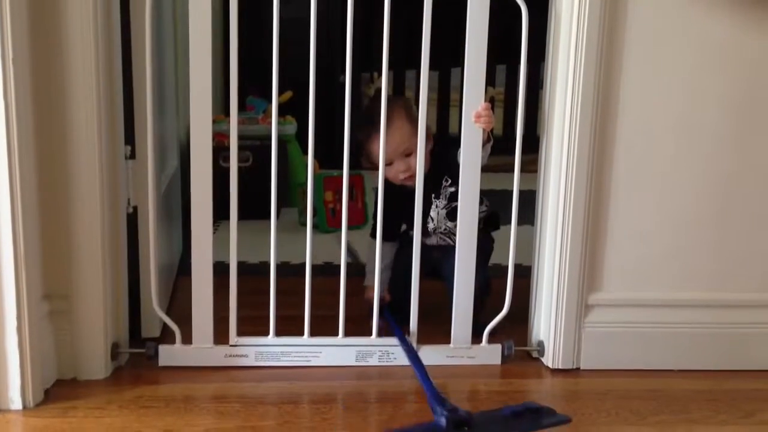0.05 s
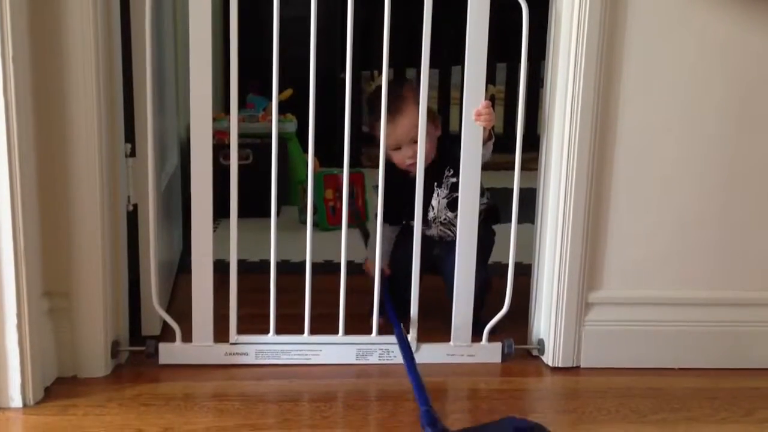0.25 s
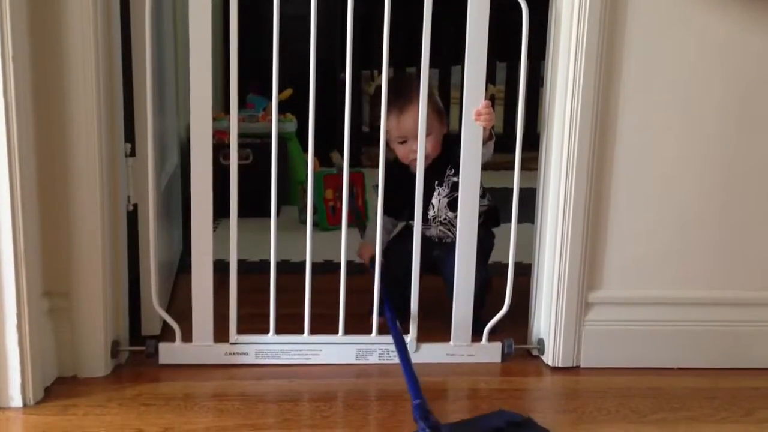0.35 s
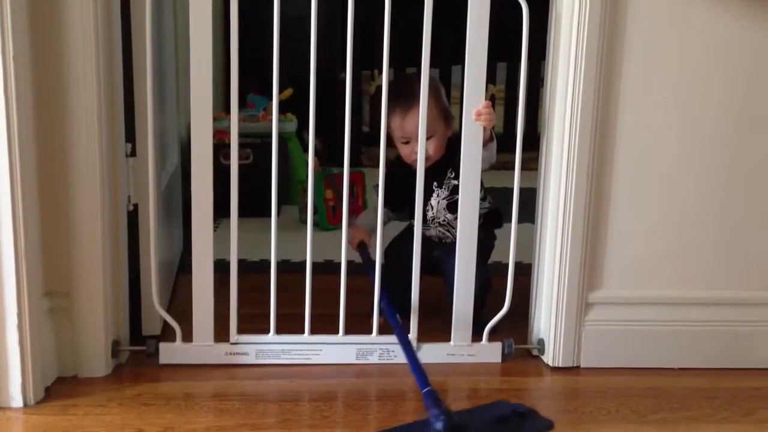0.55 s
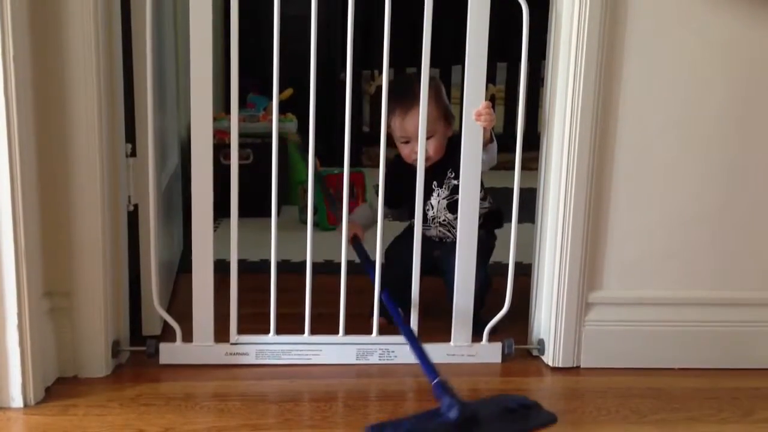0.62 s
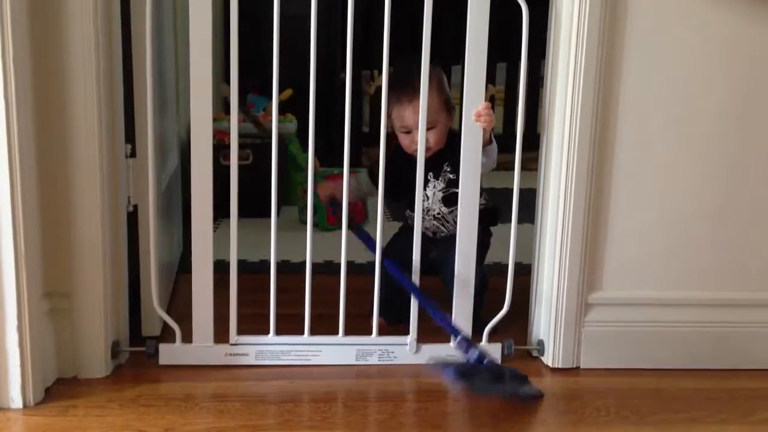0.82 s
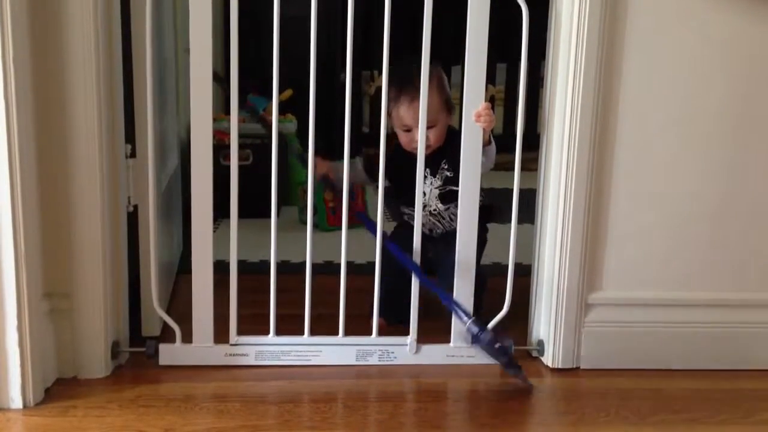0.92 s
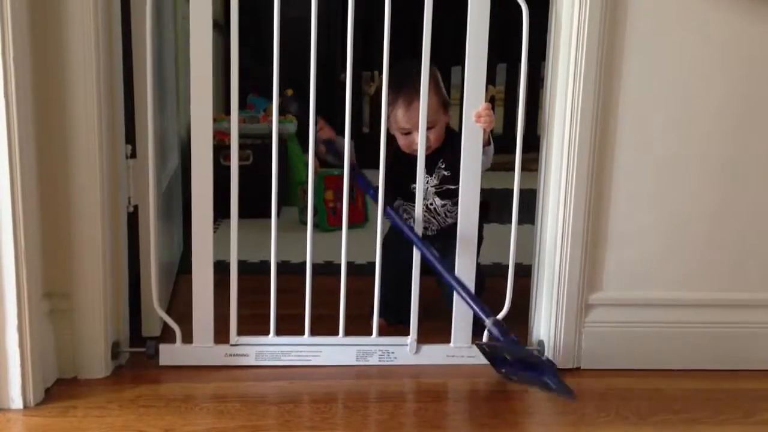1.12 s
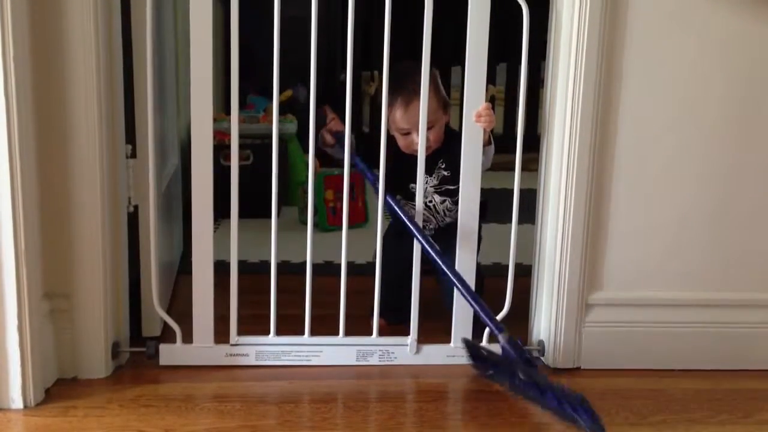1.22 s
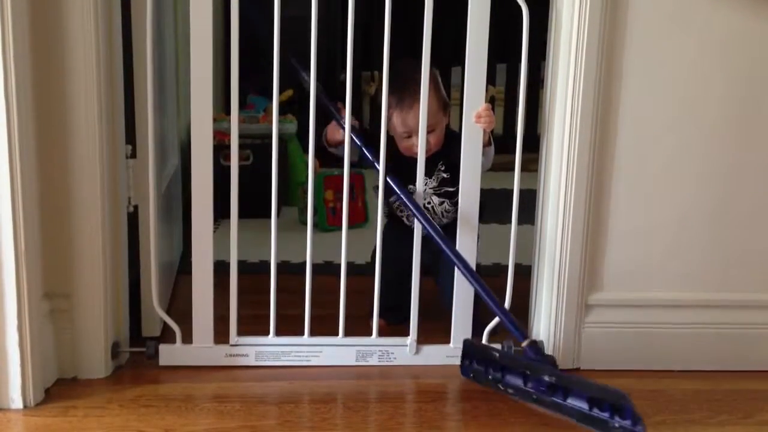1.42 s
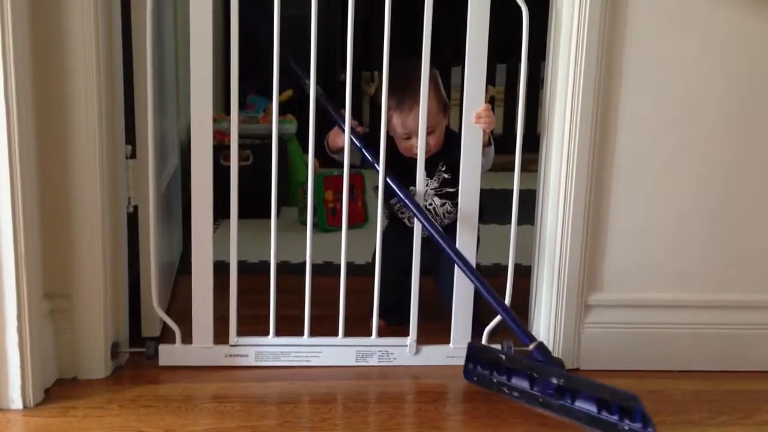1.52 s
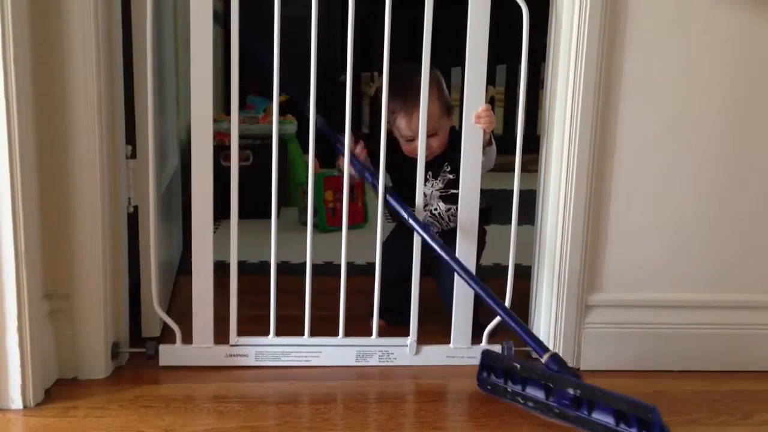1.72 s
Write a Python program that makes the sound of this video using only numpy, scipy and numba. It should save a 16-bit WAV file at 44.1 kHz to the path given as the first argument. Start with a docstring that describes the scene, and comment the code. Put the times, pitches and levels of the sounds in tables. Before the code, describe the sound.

A mop clatters against a metal safety gate: a latch clack and gate rattle, a hollow handle clink, faint dragging, plastic knocks, then a sharp floor slap, echoing in a hallway with soft hiss and hum.

```python
"""Clinks, clacks, scrapes and slaps echo in a hallway over a soft hiss and a low hum.
A mop is pulled through a metal safety gate in a hallway with a wooden floor. Its hollow handle clinks
on the bars and jolts the gate in its latch; the plastic head drags, tips over and slaps down.
Each blow is a click, a short clatter and the ring of the thing struck, with the hallway's echo.
Dragging is a crowd of tiny random slips; hiss is filtered noise and hum is a wavering sine."""
import sys
import numpy as np
from scipy import signal
from scipy.fft import rfft, irfft, next_fast_len
from scipy.io import wavfile
from numba import njit

SR = 44100
rng = np.random.default_rng(int(sys.argv[2]) if len(sys.argv) > 2 else 0)


def output_pcm(signal):
    """Save a mono or channel-first signal as 16-bit PCM at the path in sys.argv[1].

    Samples are clipped to [-1, 1] before scaling.
    """
    pcm = np.clip(np.atleast_2d(signal).T, -1, 1) * 32767
    wavfile.write(sys.argv[1], SR, np.round(pcm).astype(np.int16))


N = 77175  # length in samples

# Colour of the mop head on the floor, for slaps and drag ticks: [f/Hz, level/dB]
FLOOR_COLOUR = [(40, -38), (125, -11), (190, -2), (300, -3), (500, 1.5), (750, -1), (1050, -1.5),
                (1700, -2), (2400, 1), (3300, -1.5), (4100, -8.5), (4700, -6.5), (7000, -18.5),
                (11000, -26), (16000, -35)]
# Ringing tones of the same contact: [f/Hz, level/dB, time to fall 60 dB/s]
FLOOR_MODES = [(192, -3, .45), (305, -6, .42), (465, -1, .48), (553, -1, .42), (608, -1, .4),
               (923, -8, .33), (1127, -9, .4), (1461, -9, .42), (1979, -7, .33), (2262, -4, .32),
               (2369, -4, .35), (2660, -4, .31), (2797, -4, .26), (3284, -6, .3)]

BASS_HZ, TREBLE_HZ = 390, 6900  # corners of the bass and treble shelves
ROOM_BUILD_S, RING_BUILD_S = 0.0037, 0.0024  # how gently echo and ring swell up
WAVER_PER_S, WAVER_DB, WAVER_RAD = 45, 3, .5  # new random values per second, and their spread
GRAINS_PER_S, GRAIN_SPREAD_DB = 1200, 3.5  # slips per second and how uneven they are
AIR_DB = -62.5  # rms level of the hiss
HUM_DB, HUM_HZ = -72, 121  # peak level of the hum before it wavers, and its pitch
DUCK_ABOVE_DB, DUCK_SLOPE, DUCK_ATTACK_S, DUCK_RELEASE_S = -26.5, 0.35, 0.0067, 0.29
TOP_HZ = 15500


def undb(db):
    """Turn decibels into a plain factor."""
    return 10 ** (np.asarray(db) / 20)


def unit(x):
    """Scale to rms 1."""
    return x / np.sqrt(np.mean(x ** 2))


def on_log(points, hz):
    """Read a table between its points on a log-frequency axis."""
    f, v = np.array(points, float).T
    return np.interp(np.log(np.maximum(hz, 1)), np.log(f), v)


def colour(x, points, bass_db=0, treble_db=0):
    """Causal filter of unit power with the given spectrum, then a bass and a treble shelf."""
    size = next_fast_len(2 * N)
    hz = np.fft.rfftfreq(size, 1 / SR)
    bass_shelf = bass_db / (1 + (hz / BASS_HZ) ** 4)
    treble_shelf = treble_db * (1 - 1 / (1 + (hz / TREBLE_HZ) ** 4))
    strength = unit(undb(on_log(points, hz))) * undb(bass_shelf + treble_shelf)
    # Folding the cepstrum gives minimum phase: the filter answers at once, never early
    cepstrum = irfft(np.log(strength), size)
    cepstrum[1:size // 2] *= 2
    cepstrum[size // 2 + 1:] = 0
    return irfft(rfft(x, size) * np.exp(rfft(cepstrum)), size)[:N]


def echo():
    """The hallway's diffuse answer from one spot, of unit energy: noise dying at a pace set by pitch."""
    # How long the hallway rings in each band: [f/Hz, time to fall 60 dB/s]
    room_t60 = [(100, 0.79), (250, 0.47), (500, 0.42), (1200, 0.44), (2500, 0.35), (5000, 0.35),
                (8000, 0.33), (14000, 0.18)]
    t, hz = np.arange(N) / SR, np.fft.rfftfreq(N, 1 / SR)
    noise = rfft(rng.standard_normal(N))
    out = np.zeros(N)
    for k, (_, t60) in enumerate(room_t60):
        # Each band fades into its neighbours
        share = on_log([(f, j == k) for j, (f, _) in enumerate(room_t60)], hz)
        out += irfft(noise * share, N) * np.exp(-np.log(1000) * t / t60)
    out *= 1 - np.exp(-t / ROOM_BUILD_S)
    return out / np.linalg.norm(out)


def ringing(modes):
    """Dying tones; overlapping reflections make each one waver in level and phase."""
    t = np.arange(int(.8 * SR)) / SR
    knots, out = np.arange(0, 1, 1 / WAVER_PER_S), np.zeros(N)
    for hz, db, t60 in modes:
        swell = np.interp(t, knots, rng.standard_normal(len(knots)))
        shift = np.interp(t, knots, rng.standard_normal(len(knots)))
        phase = 2 * np.pi * (hz * t + rng.random()) + WAVER_RAD * shift
        fade = np.exp(-np.log(1000) * t / t60) * (1 - np.exp(-t / RING_BUILD_S))
        out[:len(t)] += undb(db + WAVER_DB * swell) * np.sin(phase) * fade
    return out


def blows(rows, spectrum, modes, click_db, clatter_db, clatter_s, ring_db, room_db):
    """Blows on one thing: contact click, quickly dying clatter, ringing tones and echo."""
    t, out = np.arange(N) / SR, np.zeros(N)
    for start, db, bass_db, treble_db, extra_ring_db in rows:
        clatter = rng.standard_normal(N) * np.exp(-t / clatter_s)
        hit = undb(clatter_db) * clatter / np.linalg.norm(clatter)
        hit += undb(room_db) * echo()
        hit[0] += undb(click_db)  # the click is a single sample
        ring = undb(ring_db + extra_ring_db) * ringing(modes)
        # A flat spectrum leaves only the shelves at work
        sound = colour(colour(hit, spectrum) + ring, [(1, 0)], bass_db, treble_db)
        i = min(int(start * SR), N - 1)
        out[i:] += undb(db) * sound[:N - i]
    return out


def rub(curve, spectrum):
    """Tiny slips of uneven size, smeared by the hallway, following a loudness curve."""
    happens = rng.random(N) < GRAINS_PER_S / SR
    size = undb(GRAIN_SPREAD_DB * np.minimum(rng.exponential(size=N), 4))
    slips = happens * rng.standard_normal(N) * size
    smeared = signal.fftconvolve(slips, echo())[:N]
    heard = unit(colour(slips + smeared, spectrum))
    # Nearly silent before the curve starts
    return heard * undb(np.interp(np.arange(N) / SR, *np.array(curve).T, left=-100))


def room_tone():
    """Soft indoor hiss from filtered noise, and a low hum from a sine of wavering strength."""
    # Colour of the hiss: [f/Hz, level/dB]
    air_colour = [(25, -31), (55, -24), (90, -16), (120, -2), (160, -9.5), (400, -13), (550, -11),
                  (760, -17), (1400, -17), (2000, -19.5), (2600, -19.5), (6000, -25.5), (11000, -27.5),
                  (15500, -30)]
    t = np.arange(N) / SR
    hiss = undb(AIR_DB) * unit(colour(rng.standard_normal(N), air_colour))
    waver = unit(colour(rng.standard_normal(N), [(6, -11), (30, -74), (200, -120)]))
    hum = undb(HUM_DB) * (1 + 0.13 * waver) * np.sin(2 * np.pi * HUM_HZ * t)
    return hiss + hum


def latch_clacks():
    """The gate's latch clacks: short bright ringing tones after a very brief clatter."""
    # Blows: [t/s, level/dB, extra bass/dB, extra treble/dB, extra ring/dB]
    clacks = [(.2315, -5, -0.5, -2.5, -1.5), (.2372, -16, 7.5, 10, -16)]
    # Colour of the latch: [f/Hz, level/dB]
    latch_colour = [(50, -39), (130, -20), (220, 9.5), (550, -8), (900, -2), (1500, -1), (2000, -7),
                    (2800, -4.5), (3700, -6.5), (4800, -5), (6400, -10.5), (9000, -13), (12000, -21),
                    (16000, -43)]
    # Ringing tones: [f/Hz, level/dB, time to fall 60 dB/s]
    latch_modes = [(872, -7, .2), (1516, -8, .1), (2110, -9, .1), (2694, 0, .08), (2830, 0, .06),
                   (4698, -3, .07), (5000, -3, .05), (8400, -9, .05)]
    return blows(clacks, latch_colour, latch_modes, click_db=-16.5, clatter_db=0.5,
                 clatter_s=0.0017, ring_db=-22.5, room_db=3)


def gate_jolts():
    """The metal gate is jolted in its latch: a longer clatter and many lower ringing tones."""
    # Blows: [t/s, level/dB, extra bass/dB, extra treble/dB, extra ring/dB]
    jolts = [(.2575, 2, -15.5, -1, -6.5), (.2695, 2.95, -2, 3, 1), (.2795, -0.15, 9, -12, -11)]
    # Colour of the gate: [f/Hz, level/dB]
    gate_colour = [(50, -38), (110, -33), (190, 0), (350, 1), (650, -6.5), (1100, -0.5), (1700, -3),
                   (2800, -12), (4500, -15.5), (7000, -35.5), (16000, -41)]
    # Ringing tones: [f/Hz, level/dB, time to fall 60 dB/s]
    gate_modes = [(183, -5, .32), (220, -1, .3), (265, 0, .3), (306, -1, .32), (608, -2, .3),
                  (934, -4, .48), (999, 0, .36), (1092, 0, .34), (1207, -4, .38), (1378, -3, .28),
                  (1520, -4, .3), (1698, -3, .24), (1991, -9, .27), (2133, -5, .25)]
    return blows(jolts, gate_colour, gate_modes, click_db=-6, clatter_db=3.5,
                 clatter_s=0.0079, ring_db=-31, room_db=0.5)


def handle_clinks():
    """The hollow handle clinks on the bars, ringing in tones from low to very high."""
    # Blows: [t/s, level/dB, extra bass/dB, extra treble/dB, extra ring/dB]
    clinks = [(.5088, -5, -7, -1, 0.5), (.519, -11.5, 6.5, -5, -2), (.532, -18.5, 1, 1, -21.5),
              (1.1225, -10.5, -14, 10.5, 4)]
    # Colour of the handle: [f/Hz, level/dB]
    handle_colour = [(50, -26), (120, -14.5), (230, 6.5), (520, 3.5), (1050, -2), (1500, 1), (2800, 1),
                     (3450, -1), (3820, 5), (4200, -1.5), (5200, -5.5), (7000, -17.5), (12000, -22),
                     (16000, -29)]
    # Ringing tones: [f/Hz, level/dB, time to fall 60 dB/s]
    handle_modes = [(277, -3, .58), (507, -5, .35), (773, 0, .3), (812, -1, .28), (894, -4, .3),
                    (1435, -3, .2), (1717, -3, .22), (2079, -3, .22), (2410, -6, .26), (3753, -4, .32),
                    (3823, 1, .22), (3877, 4, .1), (5451, -11, .2), (12400, -25, .14)]
    return blows(clinks, handle_colour, handle_modes, click_db=-8, clatter_db=-1,
                 clatter_s=0.0075, ring_db=-33, room_db=0)


def head_slide():
    """The plastic head drags along: many tiny slips that swell and fade."""
    # Loudness of the drag: [t/s, level/dB]
    slide_curve = [(.62, -68), (.74, -60), (.78, -58), (.86, -57.5), (.93, -60), (.99, -64.5), (1.05, -68)]
    # Colour of the drag: [f/Hz, level/dB]
    slide_colour = [(100, -42), (260, 3), (420, -10), (750, -8.5), (1000, -21), (1400, -14), (2300, -8.5),
                    (3500, -16.5), (4500, -10.5), (6000, -20.5), (9000, -28), (15000, -33.5)]
    return rub(slide_curve, slide_colour)


def drag_ticks():
    """Faint ticks as the head drags: small blows with the colour and tones of the slaps."""
    # Blows: [t/s, level/dB, extra bass/dB, extra treble/dB, extra ring/dB]
    ticks = [(.772, -30, -3, 6, 0), (.783, -28.5, -6, 1.5, 0.0058), (.922, -31.5, -1, 2, 0),
             (.987, -29.5, 0, 0, 0)]
    return blows(ticks, FLOOR_COLOUR, FLOOR_MODES, click_db=-10, clatter_db=-1.5,
                 clatter_s=0.0034, ring_db=-46, room_db=-7.5)


def shell_judder():
    """The head's shell rubs: tiny slips with a loudness and colour of their own."""
    # Loudness of the rubbing: [t/s, level/dB]
    judder_curve = [(.8, -81), (.95, -55.5), (1.05, -56), (1.28, -45.5), (1.45, -36.5), (1.6, -59),
                    (1.7, -63)]
    # Colour of the rubbing: [f/Hz, level/dB]
    judder_colour = [(100, -58), (300, -7), (430, 3.5), (620, -15.5), (1000, -5), (1500, -19.5),
                     (2400, -9.5), (6000, -38)]
    return rub(judder_curve, judder_colour)


def head_knocks():
    """The plastic head knocks: a longer clatter and mostly low ringing tones."""
    # Blows: [t/s, level/dB, extra bass/dB, extra treble/dB, extra ring/dB]
    knocks = [(1.0682, -0.5, -3.5, -7.5, -1), (1.0745, 0, -2, 0, -8.5), (1.0815, -3.5, -1, 0, -10.5),
              (1.091, -6.5, -1, -8, -4), (1.126, -4, 5.5, 6, -7.5), (1.157, -11, 4, -10, -19),
              (1.747, -30, 28, -1, -15)]
    # Colour of the head: [f/Hz, level/dB]
    head_colour = [(50, -38), (125, -16.5), (160, -8.5), (260, -3), (400, 2.5), (780, -12.5), (1250, -10),
                   (1750, -11), (2400, -12), (3100, -17), (4500, -20), (7000, -31), (10000, -44),
                   (16000, -47)]
    # Ringing tones: [f/Hz, level/dB, time to fall 60 dB/s]
    head_modes = [(149, -13, .6), (349, -6, .42), (419, 0, .44), (462, -8, .4), (550, -8, .39),
                  (666, -8, .33), (995, -12, .35), (1034, -10, .38), (1236, -11, .3), (1290, -10, .3),
                  (1438, -15, .35), (1838, -17, .4), (2033, -15, .34), (2267, -13, .35)]
    return blows(knocks, head_colour, head_modes, click_db=-14, clatter_db=-1.5,
                 clatter_s=0.011, ring_db=-23, room_db=2)


def head_slaps():
    """The head slaps down: blows in very close succession, with a strong click and brief clatter."""
    # Blows: [t/s, level/dB, extra bass/dB, extra treble/dB, extra ring/dB]
    slaps = [(1.3385, 5.94, -1.9, -5.5, -1), (1.3402, 5, -1.2, 1.5, 0), (1.3423, 0.39, 3.8, -10, -21)]
    return blows(slaps, FLOOR_COLOUR, FLOOR_MODES, click_db=-4, clatter_db=2.5,
                 clatter_s=0.0028, ring_db=-37.5, room_db=-1.5)


def scene():
    """Add up all the sounds into one channel."""
    gate_sounds = latch_clacks() + gate_jolts() + handle_clinks()
    drag_sounds = head_slide() + drag_ticks() + shell_judder()
    head_blows = head_knocks() + head_slaps()
    return (room_tone() + gate_sounds + drag_sounds + head_blows)[None]


@njit
def follow(x, attack, release):
    """Track the level, rising fast and falling slowly."""
    out, level = np.empty(len(x)), 1e-6
    for i in range(len(x)):
        size = abs(x[i])
        level += (size - level) * (attack if size > level else release)
        out[i] = level
    return out


def record(dry):
    """The recorder's gain control dips after loud blows; the top is cut."""
    level = follow(dry[0], 1 / (DUCK_ATTACK_S * SR), 1 / (DUCK_RELEASE_S * SR))
    gain = np.maximum(level / undb(DUCK_ABOVE_DB), 1) ** -DUCK_SLOPE
    top_cut = signal.ellip(10, .2, 70, TOP_HZ, fs=SR, output="sos")
    return signal.sosfilt(top_cut, dry * gain)


dry = scene()
out = record(dry)
output_pcm(out)
```